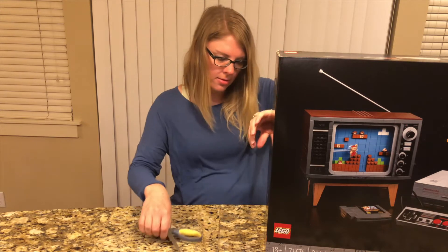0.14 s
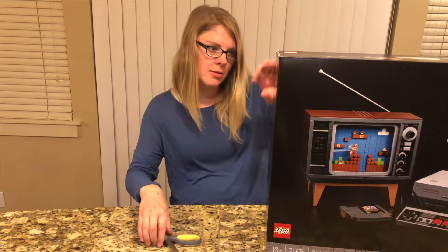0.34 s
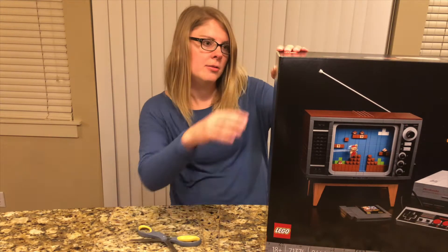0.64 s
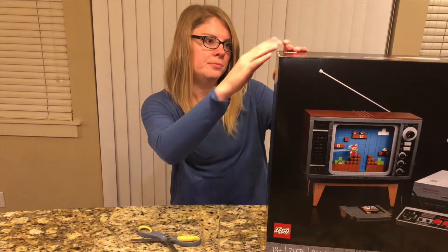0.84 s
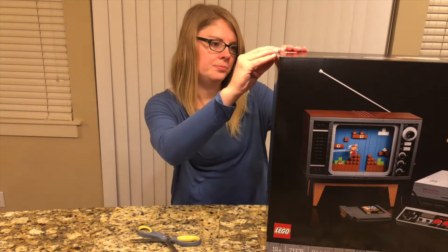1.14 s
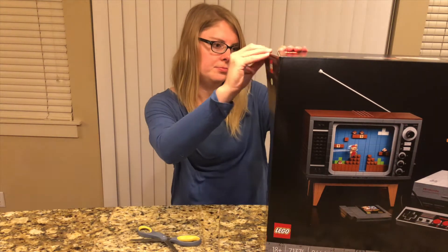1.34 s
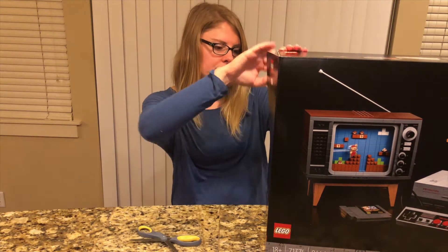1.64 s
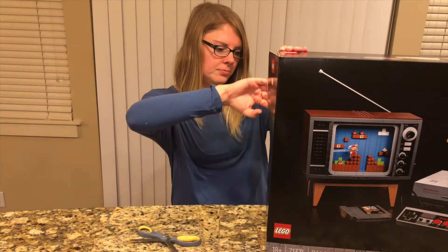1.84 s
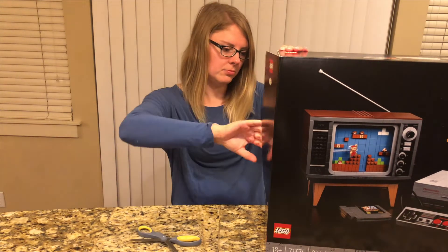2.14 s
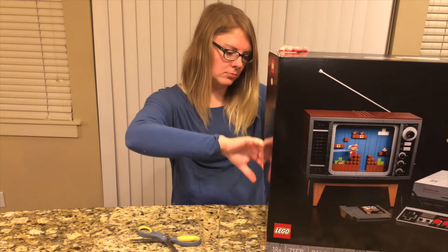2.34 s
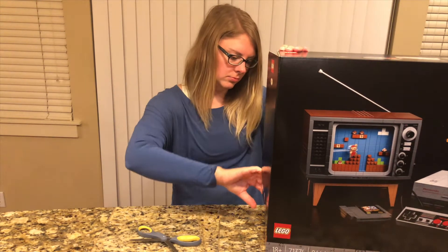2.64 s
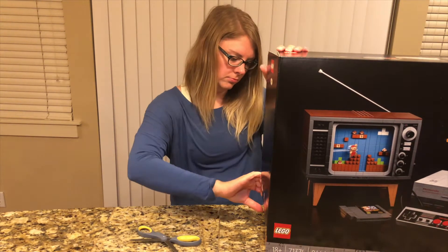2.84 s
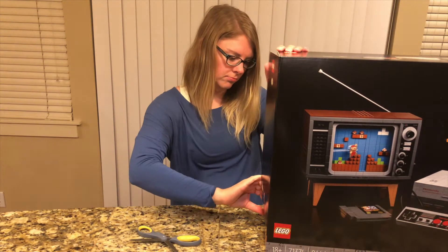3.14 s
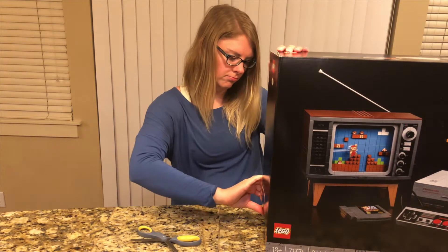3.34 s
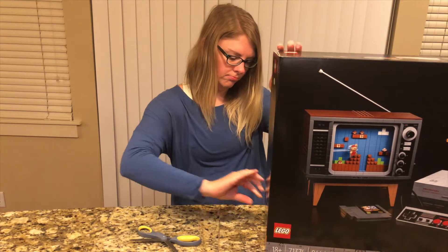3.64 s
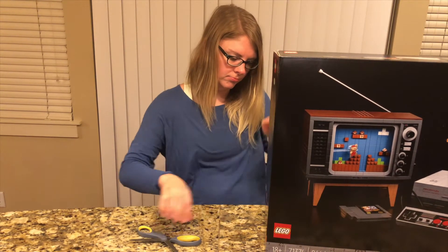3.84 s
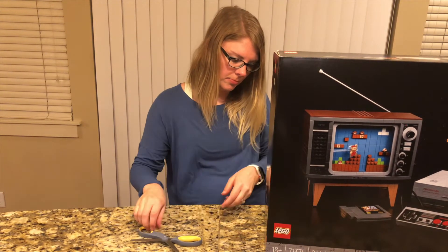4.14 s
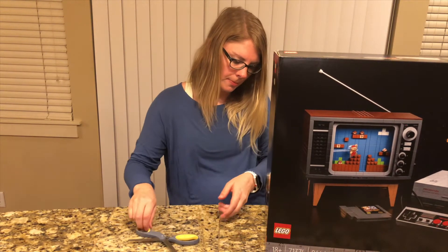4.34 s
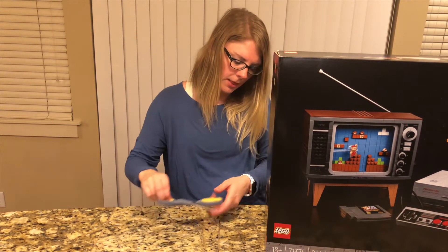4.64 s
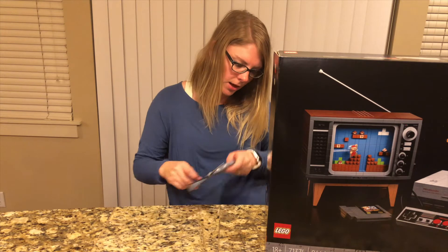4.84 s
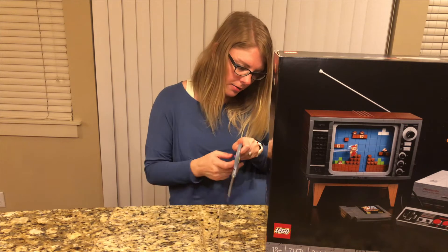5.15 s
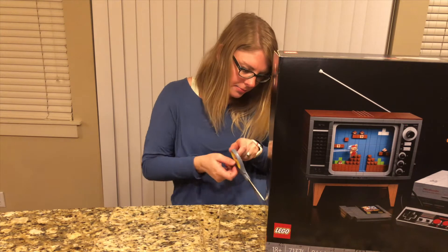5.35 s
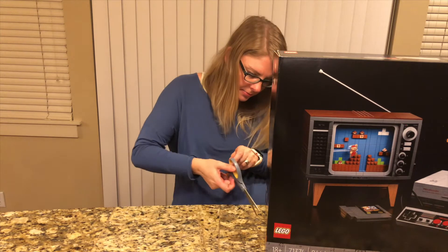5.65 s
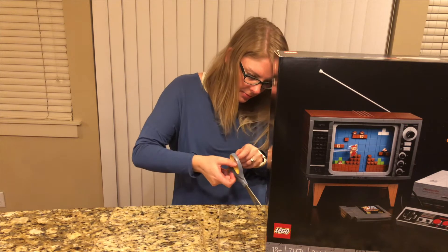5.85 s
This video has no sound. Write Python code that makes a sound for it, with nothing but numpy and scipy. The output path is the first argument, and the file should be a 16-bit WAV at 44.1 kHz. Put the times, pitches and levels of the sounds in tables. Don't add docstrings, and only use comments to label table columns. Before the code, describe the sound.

Scissors land on a stone counter with a loud bright clatter and skid. Fingers then pop two tabs on a large hollow cardboard box, the second harder and boomier, stroke its glossy side and pick at tape. The scissors scrape back and snap shut softly. A low appliance hum runs throughout; close phone microphone in a reverberant kitchen-like room.

```python
import sys
import numpy as np
from scipy import signal
from scipy.fft import rfft, irfft, next_fast_len
from scipy.io import wavfile
from scipy.ndimage import uniform_filter1d, map_coordinates

SR = 44100
rng = np.random.default_rng(int(sys.argv[2]) if len(sys.argv) > 2 else 0)


def int16_out(signal):
    q = np.round(np.clip(np.atleast_2d(signal).T, -1, 1) * 32767)
    wavfile.write(sys.argv[1], SR, q.astype(np.int16))


def volts_from_decibels(level):
    exponent = np.asarray(level, float) / 20
    return 10 ** exponent


N = 264159


def unit(x):
    return x / np.sqrt(np.mean(x ** 2) + 1e-20)


def along(points, hz):
    f, v = np.transpose(points)
    return np.interp(np.log(hz + 1), np.log(f + 1), v)


def wobble(rate_hz):
    knots = rng.standard_normal(int(N * rate_hz / SR) + 4)
    return map_coordinates(knots, [np.arange(N) * rate_hz / SR])


def filtered(x, response):
    m = next_fast_len(len(x) + SR // 2)
    return irfft(rfft(x, m) * response(np.fft.rfftfreq(m, 1 / SR)), m)[:len(x)]


def coloured(points):
    return lambda f: volts_from_decibels(along(points, f))


def resonances(modes):
    def response(f):
        total = 0
        for k, (hz, width_hz, db) in enumerate(modes):
            damping = 1j * f * width_hz
            total = total + (-1) ** k * volts_from_decibels(db) * damping / (hz * hz - f * f + damping)
        return total
    return response


def friction(response, grain_db, rate_hz, patchy_db=2.0):
    grains = rng.standard_normal(N) * volts_from_decibels(grain_db * wobble(rate_hz))
    z = signal.stft(grains, nperseg=256)[2]
    field = uniform_filter1d(rng.standard_normal(z.shape), size=8, axis=0)
    field = uniform_filter1d(field, size=16, axis=1)
    patchy = signal.istft(z * volts_from_decibels(patchy_db * unit(field)), nperseg=256)[1][:N]
    return unit(filtered(patchy, response))


def swells(rows):
    t = np.arange(N) / SR
    power = np.zeros(N)
    for s, db, rise_s, fall_s in rows:
        away = np.maximum((s - t) / abs(rise_s), (t - s) / abs(fall_s))
        power += volts_from_decibels(db - 20 * away) ** 2
    return np.sqrt(uniform_filter1d(power, size=600).clip(0))


def rings(rows, rise_s):
    out, t = np.zeros(N + SR), np.arange(SR // 2) / SR
    onset = 1 - np.exp(-t / rise_s)
    for s, db, hz, t60_s in rows:
        out[round(s * SR):][:len(t)] += volts_from_decibels(db - 60 * t / t60_s) * np.sin(2 * np.pi * hz * t) * onset
    return out[:N]


def contacts(events, edge_hz, rise_s):
    crack, spread, t = np.zeros(N + SR), np.zeros(N + SR), np.arange(2048) / SR
    for s, db, *_, tilt_db, t60_s in events:
        def colour(f):
            return volts_from_decibels(tilt_db * np.log2((f + 1500) / 5000)) * (1j * f / (edge_hz + 1j * f)) ** 2
        shape = volts_from_decibels(-60 * t / np.clip(t60_s, .003, .08)) * (1 - np.exp(-t / rise_s))
        burst = filtered(rng.standard_normal(len(t)), colour) * shape
        burst *= volts_from_decibels(db + 2) / np.abs(burst).max()
        click = filtered(1. * (np.arange(len(t)) == 32), colour)
        click *= np.linalg.norm(burst) / np.linalg.norm(click)
        crack[round(s * SR):][:len(t)] += burst
        spread[round(s * SR):][:len(t)] += click
    return crack[:N], spread[:N]


def appliance():
    # pitch_hz, rms_db
    hum = [(59.2, -61.5), (96.9, -61.5), (199.2, -47.5), (247.6, -62.5), (317.6, -67.5), (355.3, -65.5),
           (414.5, -64), (597.5, -71.5), (1723, -79)]
    # freq_hz, density_db (per Hz)
    air = [(25, -50), (45, -24), (75, -26), (100, -7.5), (125, -17), (165, -16.5), (200, -6), (230, -14.5),
           (410, -13.5), (500, -22.5), (900, -28), (1750, -35), (2100, -38.5), (12300, -47), (15800, -51)]
    t = np.arange(N) / SR
    tones = np.zeros(N)
    for hz, db in hum:
        level = volts_from_decibels(db + 3.5 + 0.34 * wobble(22))
        phase = 0.2 * wobble(8) + rng.uniform(0, 2 * np.pi)
        tones += level * np.sin(2 * np.pi * hz * t + phase)
    return tones + volts_from_decibels(-54.5) * friction(coloured(air), grain_db=1.7, rate_hz=8.8, patchy_db=1.0)


def scissors():
    # start_s, peak_db, tilt_db (per octave)
    clatter = [(0.1523, -28, -4.5), (0.2428, -18.5, -7), (0.268, -8.5, 1), (0.3014, -8, 1.5),
               (0.3164, -11, 2), (0.3686, -12.5, -2.5), (0.383, -16, 4), (0.9168, -44.5, -1.5),
               (4.0497, -32.5, -8), (4.0632, -35, -2), (4.0788, -36, -8), (4.099, -48, 5.5),
               (4.351, -36, -13.5), (4.4035, -24, 3.5), (4.7731, -51.5, -5.5)]
    # start_s, peak_db, tilt_db (per octave)
    bumps = [(0.31, -11.5, -5), (0.3637, -16, -4), (0.39, -23.5, -12), (0.5681, -34.5, -12.5),
             (0.584, -51, -5), (0.7182, -37, -19), (0.7414, -45, -14), (0.8594, -42, -22),
             (0.9796, -55, -36), (1.072, -50, -9), (4.0677, -27.5, -10), (4.0874, -29, -11),
             (4.1854, -33, -15.5), (4.1894, -38, -19)]
    # start_s, level_db, pitch_hz
    handle_notes = [(0.1525, -41, 1400), (0.2446, -25, 1550), (0.2685, -15, 1256), (.3099, -27.5, 687),
                    (0.3632, -18.5, 907), (.3904, -37, 654), (.5681, -41, 2170), (.5844, -36.5, 1140),
                    (.636, -38, 537), (.7185, -40, 566), (.8594, -41, 586), (0.979, -46, 1010),
                    (4.0496, -34.5, 1270), (4.0634, -35, 2530), (4.0677, -27, 2330), (4.081, -34, 1390),
                    (4.0993, -33, 1570), (4.1894, -36.5, 710), (4.2, -38, 555), (4.299, -39, 555),
                    (4.355, -43, 1390)]
    # start_s, level_db, pitch_hz, t60_s
    steel = [
        (.153, -42.5, 3010, 0.038),
        (4.351, -41, 2480, 0.014),
        (4.351, -46, 3360, .02),
        (4.403, -40, 2450, 0.033),
        (4.403, -45, 4830, 0.045),
        (4.403, -51, 6550, 0.023),
        (4.403, -38, 8200, 0.033),
    ]
    # freq_hz, width_hz, level_db
    handle_modes = [(298.4, 66, -2), (555, 4.6, 6.5), (690.6, 33, 5.5), (1056, 56, -11.5), (1140, 19, -1.5),
                    (1510, 212, -3), (2200, 480, -9.5), (3740, 1450, -21)]
    # freq_hz, width_hz, level_db
    blade_modes = [(2450, 48, -10.5), (4560, 100, 4), (6550, 100, -6), (8200, 823, 0), (9440, 520, -8.5),
                   (11200, 390, -1.5)]
    # peak_s, level_db, rise_s, fall_s, grit_db (over the scrape)
    drag = [
        (.32, -20, 0.045, 0.068, -10),
        (.38, -23.5, 0.11, 0.11, -6.5),
        (.6, -41, 0.2, 0.087, -12.5),
        (4.07, -30, 0.027, 0.13, -13),
        (4.195, -37, .03, 0.14, -25),
        (4.36, -50.5, .6, 0.42, -21),
        (5, -63.5, 0.45, 0.33, -4),
        (5.33, -63.5, 0.46, .4, -6),
        (5.8, -69.5, 0.38, 0.41, -7),
    ]
    # freq_hz, density_db (per Hz)
    grit_colour = [(1470, -34), (2500, -4.5), (2900, -11), (3890, -1.5), (6650, -10), (7420, -6),
                   (16000, -30)]

    sharp = contacts([(*e, 0.02) for e in clatter], edge_hz=1070, rise_s=0.000067)
    dull = contacts([(*e, 0.0175) for e in bumps], edge_hz=560, rise_s=0.00071)
    crack, spread = np.add(sharp, dull)
    body = rings([(*e, 0.031) for e in handle_notes], rise_s=0.00036)
    body = body + rings(steel, rise_s=0.000535) * wobble(500)
    body = body + volts_from_decibels(2.5) * filtered(spread, resonances(blade_modes))
    body = body + volts_from_decibels(3.0) * filtered(spread, resonances(handle_modes))

    scrape = swells([e[:4] for e in drag]) * friction(resonances(handle_modes), grain_db=6.0, rate_hz=85)
    grit_rows = [(s, db + grit_db, rise_s, fall_s) for s, db, rise_s, fall_s, grit_db in drag]
    grit = swells(grit_rows) * friction(coloured(grit_colour), grain_db=5.5, rate_hz=210)
    return crack + body, volts_from_decibels(-2.5) * spread + body, volts_from_decibels(-5.5) * (scrape + grit)


def kind(events, contact):
    knock_db, tilt_db, t60_s = contact
    return [(s, db, knock_db, hz, tilt_db, t60_s) for s, db, hz in events]


def cardboard(events, rise_s, wet_db):
    # freq_hz, width_hz, level_db
    panel_modes = [(196.7, 32.4, 19), (295, 66, 3), (356, 12, 13), (450, 250, 5.5), (618.7, 360, 2),
                   (990, 180, -39.5), (1700, 1800, -15)]
    crack, spread = contacts(events, edge_hz=460, rise_s=rise_s)
    knocks = [(s + 0.0013, db + knock_db, hz, .012) for s, db, knock_db, hz, *_ in events]
    push = rings(knocks, rise_s=0.00046)
    body = volts_from_decibels(2.5) * push + volts_from_decibels(8.5) * filtered(push, resonances(panel_modes))
    return np.array([crack + body, volts_from_decibels(wet_db) * (spread + body)])


def tab_pops():
    # start_s, snap_db, slap_db, knock_hz
    pops = [
        (1.2594, -15.5, -18, 450),
        (1.9152, -11.5, -8, 535),
    ]
    # knock_db, tilt_db (per octave), t60_s
    snap = (-25.5, 4.4, 0.0044)
    slap = (-6.5, -6.5, .016)
    # freq_hz, gain_db
    tab = [(500, -1.5), (1000, 5.5), (1800, 6), (3500, 1.5), (6000, 0), (9000, 3.5), (14000, 0)]
    # start_s, level_db, pitch_hz, t60_s
    boom = [
        (1.261, -31, 234, 0.24),
        (1.261, -37, 310, 0.11),
        (1.917, -38, 79.6, 0.27),
        (1.917, -22.5, 122.6, 0.44),
        (1.917, -28, 173, 0.31),
        (1.917, -28, 260, 0.28),
        (1.917, -32, 320.5, 0.34),
        (3.02, -50, 65, .15),
        (3.625, -36, 74, 0.11),
    ]
    snaps = kind([(s, db, hz) for s, db, _, hz in pops], snap)
    slaps = kind([(s, db, hz) for s, _, db, hz in pops], slap)
    paths = cardboard(snaps + slaps, rise_s=0.00023, wet_db=2.0)
    return np.array([filtered(path, coloured(tab)) for path in paths]) + rings(boom, rise_s=0.012)


def fingers():
    # start_s, peak_db, knock_hz
    taps = [
        (1.4315, -43.5, 889),
        (1.4636, -37, 452),
        (1.4815, -39, 619),
    ]
    # start_s, peak_db, knock_hz
    picks = [(2.705, -42, 577), (2.7306, -37.5, 530), (2.7824, -35.5, 590), (2.831, -31.5, 608),
             (2.9597, -29, 556), (2.9802, -34, 473), (2.9994, -35, 480), (3.092, -44, 473),
             (3.1287, -42, 525), (3.1882, -37, 550), (3.2302, -39, 560), (3.252, -38.5, 710),
             (3.374, -57, 452), (3.4014, -51, 501), (3.4189, -51, 552), (3.4546, -48, 470),
             (3.511, -39, 596), (3.5493, -46, 588), (3.6079, -35, 530), (3.6264, -40, 530)]
    # start_s, peak_db, knock_hz
    ticks = [
        (1.5844, -35, 1250),
        (2.098, -48, 900),
        (2.139, -50, 900),
        (3.2094, -59, 1230),
        (3.7739, -52, 456),
        (3.7894, -54.5, 708),
        (3.8096, -50, 549),
    ]
    # knock_db, tilt_db (per octave), t60_s
    tap = (1.5, -5, .024)
    pick = (-2.5, -7.5, .024)
    tick = (-18, -1.5, .021)
    # start_s, peak_db, pitch_hz, t60_s
    thuds = [(0.297, -45, 127, 0.25), (0.368, -44, 110, 0.15), (0.471, -43, 74, 0.12),
             (0.861, -51, 111, 0.2), (1.266, -46, 127, 0.46), (1.466, -42, 153, 0.09),
             (1.555, -45, 66, 0.12), (1.678, -46, 126, 0.13), (2.788, -52, 122, 0.2), (2.96, -54, 98, 0.22),
             (3.021, -53, 66, 0.12), (3.248, -52, 133, 0.14), (3.308, -50, 123, 0.16),
             (3.518, -48, 131, 0.18), (3.616, -36.5, 115, 0.075), (4.069, -65, 67.3, 0.18),
             (4.198, -81, 94.2, 0.2)]
    # start_s, level_db, pitch_hz, t60_s
    scuffs = [(3.375, -50, 1980, 0.046), (3.405, -48, 2470, 0.089), (3.425, -59, 2590, 0.059),
              (3.456, -39, 1880, 0.044), (3.545, -43.5, 2570, 0.097), (3.58, -39, 4550, 0.055)]
    events = kind(taps, tap) + kind(picks, pick) + kind(ticks, tick)
    knocks = cardboard(events, rise_s=0.0011, wet_db=-0.5)
    return knocks + volts_from_decibels(5.5) * rings(thuds, rise_s=0.0032) + rings(scuffs, rise_s=0.0037) * wobble(900)


def sliding_hand():
    # peak_s, level_db, rise_s, fall_s
    strokes = [(.77, -63.5, 0.058, 0.25), (1.13, -68.5, 0.6, .6), (1.445, -59, 0.037, 0.046),
               (1.485, -52, 0.018, 0.097), (1.66, -45.5, 0.25, 0.26), (1.855, -49, 0.041, 0.15),
               (2.28, -48, 0.23, 0.42), (2.49, -55, 0.37, 0.043), (2.635, -50, 0.11, 0.057),
               (2.99, -63, .1, .2), (3.24, -65, .1, 0.15), (3.42, -67, .1, .15), (3.57, -50, 0.033, .15),
               (3.61, -51.5, 0.094, 0.051), (3.8, -65, 0.045, .04)]
    # peak_s, level_db, rise_s, fall_s
    presses = [(.74, -54.5, 0.18, 0.22), (1.06, -57, 0.39, 0.39), (1.38, -48, .15, 0.75),
               (1.485, -46, 0.054, 0.061), (1.72, -51, 0.14, .12), (2.27, -56, 0.56, 0.97),
               (2.6, -57.5, .5, 0.14), (2.8, -52.5, 0.34, 0.42), (2.99, -44, 0.099, 0.17),
               (3.25, -46.5, 0.21, 0.2), (3.44, -57, 0.27, 0.31), (3.57, -42.5, 0.11, 0.14),
               (3.81, -71.5, .05, .05)]
    # freq_hz, density_db (per Hz)
    skin = [(710, -18), (1200, 0.5), (2300, -2), (2920, -2), (7410, -6.5), (9010, -6), (14700, -9.5),
            (16000, -14)]
    # freq_hz, density_db (per Hz)
    wall_colour = [(150, -32), (250, 6.5), (420, 0), (600, -2.5), (1000, -5), (2500, -13.5), (5000, -25.5),
                   (10000, -46.5)]
    hiss = swells(strokes) * friction(coloured(skin), grain_db=1.0, rate_hz=180, patchy_db=1.2)
    wall = swells(presses) * friction(coloured(wall_colour), grain_db=3.5, rate_hz=120)
    return hiss + wall


def room(x, size=8192):
    # freq_hz, t60_s
    decay = [(100, 0.66), (500, 0.69), (2000, 0.57), (6000, 0.58), (14000, 0.25)]
    out = np.zeros(N + 2 * SR)
    for start in range(0, N, size):
        hz, t, z = signal.stft(rng.standard_normal(SR * 3 // 4), SR, nperseg=256)
        tail = signal.istft(z * volts_from_decibels(-60 * t / along(decay, hz)[:, None]), SR, nperseg=256)[1]
        tail *= 1 - np.exp(-np.arange(len(tail)) / SR / 0.002)
        wet = signal.fftconvolve(x[start:start + size], tail / np.linalg.norm(tail))
        out[start:][:len(wet)] += wet
    return out[:N]


def scene():
    hum = appliance()
    knocks, knocks_out, scrape = scissors()
    taps, taps_out = tab_pops() + fingers()
    slide = sliding_hand()
    wet = room(volts_from_decibels(-3) * knocks_out + volts_from_decibels(-9.5) * taps_out + volts_from_decibels(-8.5) * (scrape + slide))
    return (knocks + taps + scrape + slide + wet + hum)[None]


def roll_off(x):
    return signal.sosfilt(signal.butter(12, 17110, fs=SR, output="sos"), x)


def record(dry):
    soft = dry[0] / (1 + np.abs(dry[0] / .62) ** 4) ** (1 / 4)
    top_hz = 15600
    band = filtered(soft, lambda f: 1 / (1 + (f / top_hz) ** 40))
    return roll_off(band[None])


dry = scene()
out = record(dry)
int16_out(out)
```